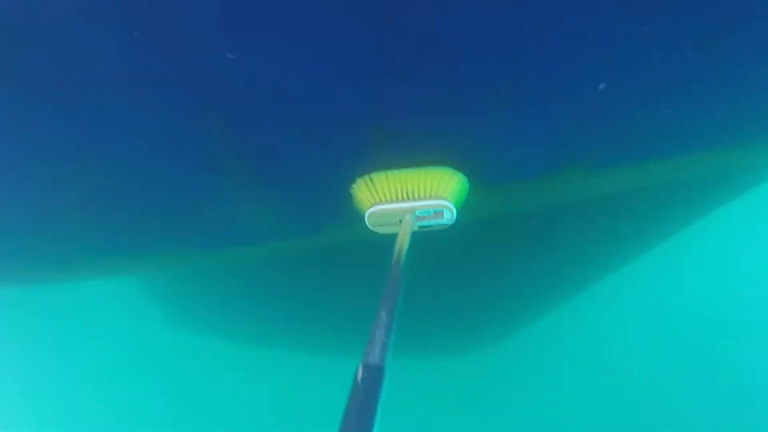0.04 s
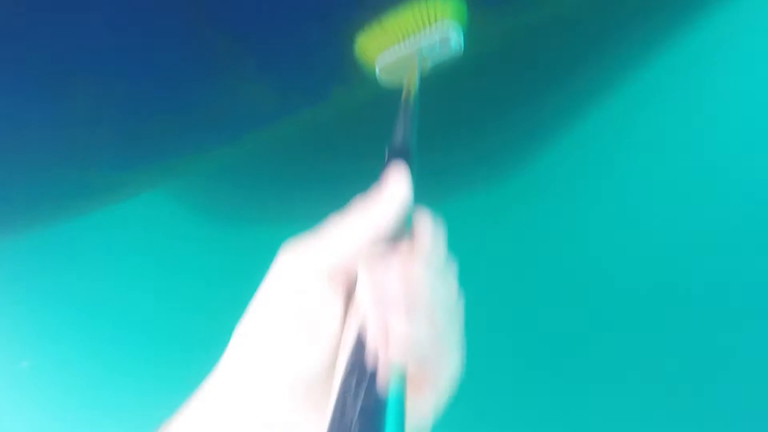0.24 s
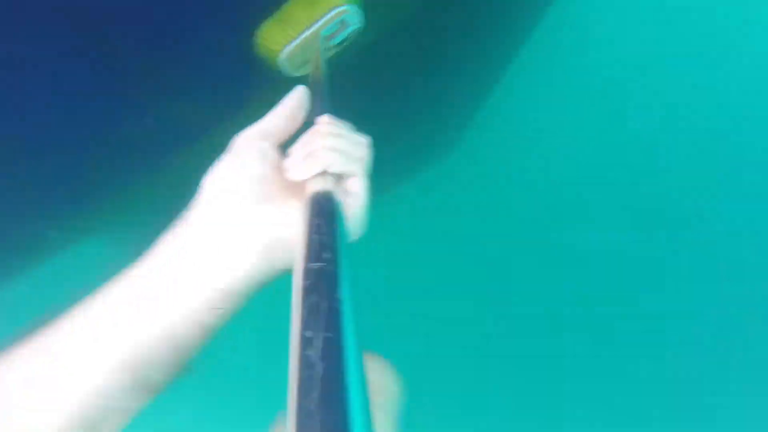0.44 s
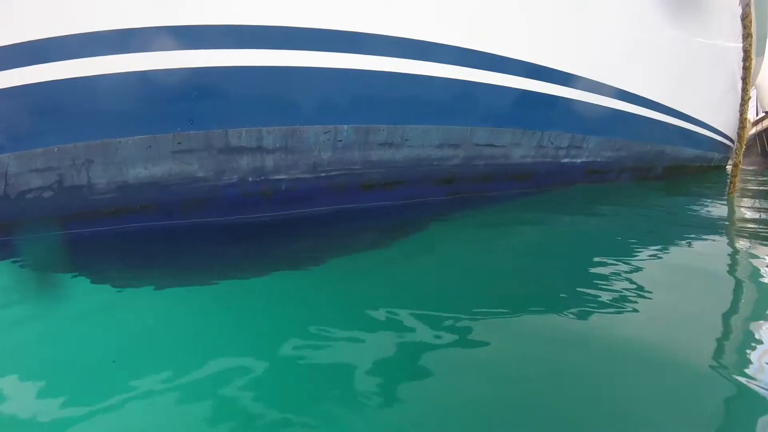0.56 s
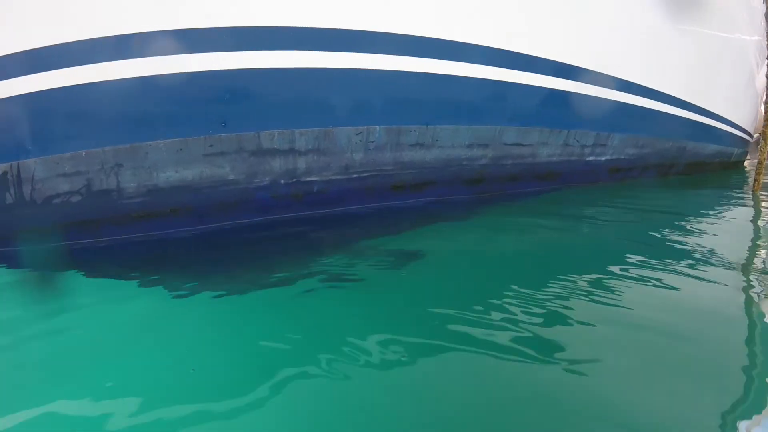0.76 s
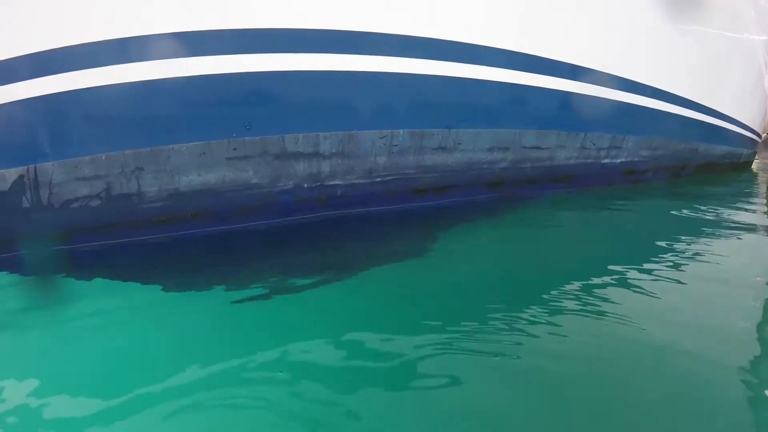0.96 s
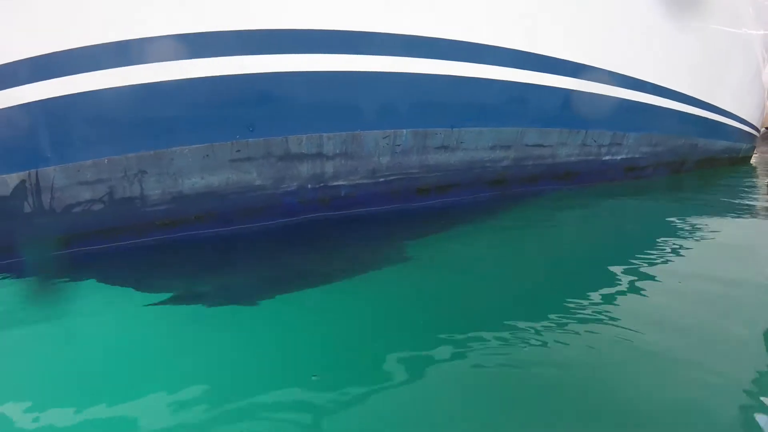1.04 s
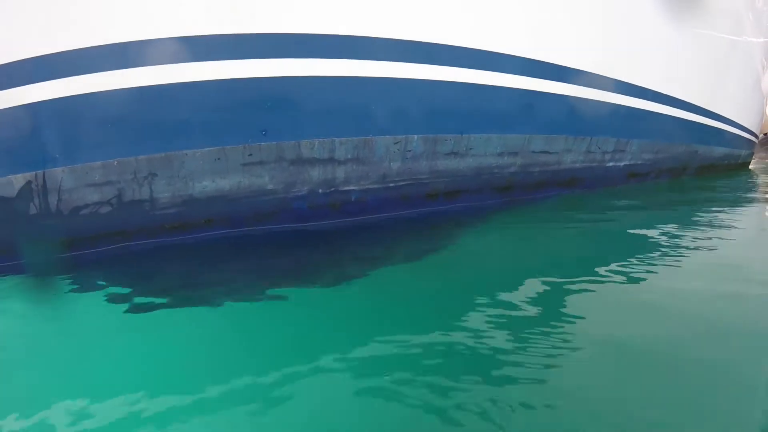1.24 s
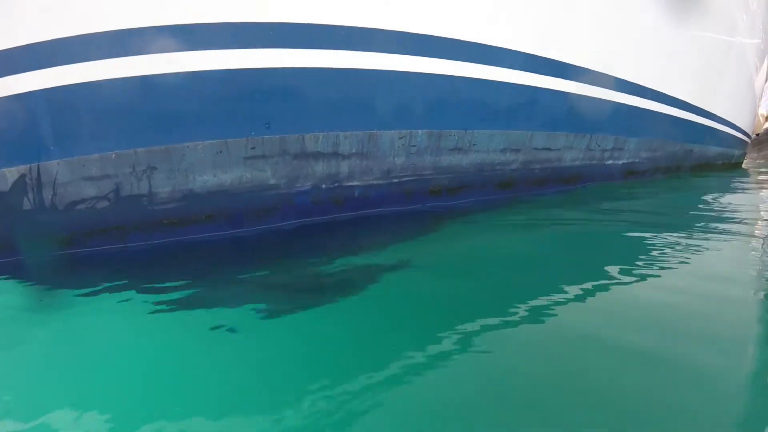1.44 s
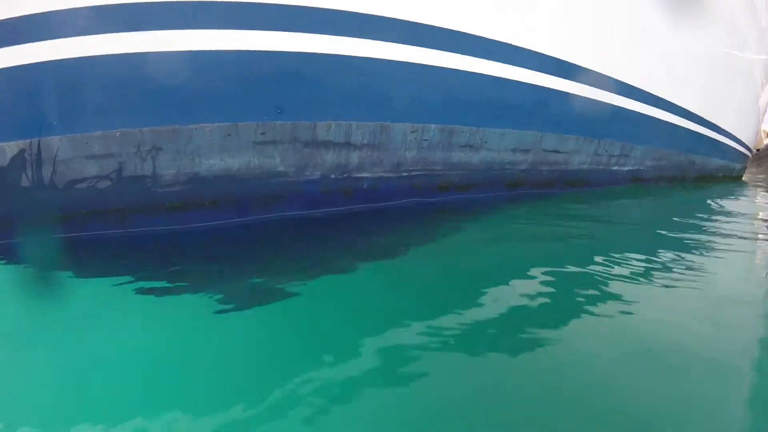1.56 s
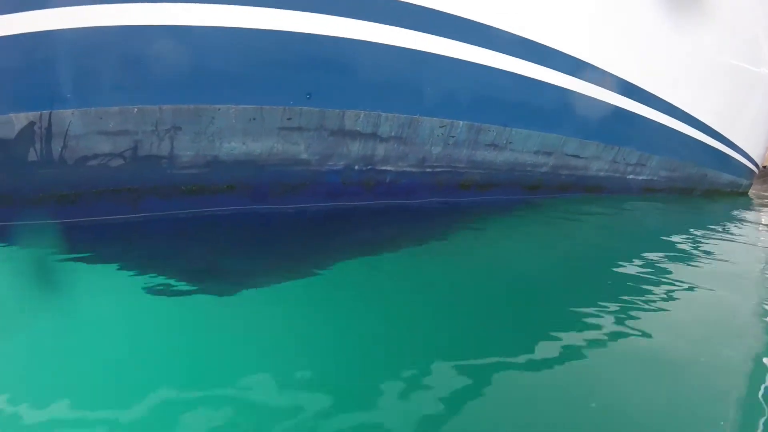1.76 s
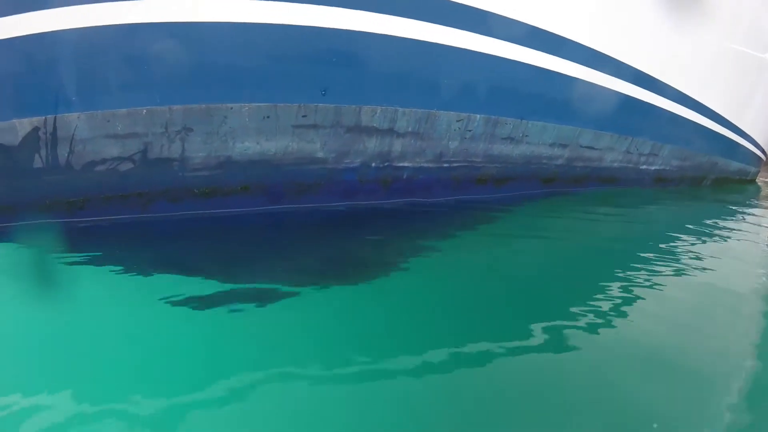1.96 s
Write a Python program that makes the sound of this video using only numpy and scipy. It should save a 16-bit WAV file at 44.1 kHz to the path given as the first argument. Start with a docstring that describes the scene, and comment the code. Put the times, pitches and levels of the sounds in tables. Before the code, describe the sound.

A brush bumps and scrubs a hull underwater, cutting abruptly to quiet open air.

```python
"""Brush on a boat hull, under water.

Heard from a sealed camera housing: the long brush pole ticks and bumps, the housing takes one hollow
knock, stick-slip rubbing groans through it and water sways against it. At 0.56 s the scene switches
abruptly to quiet air above the surface: a light breeze and one drip. Faint hiss runs throughout."""
import sys
import numpy as np
from scipy import signal
from scipy.fft import rfft, irfft
from scipy.io import wavfile
from scipy.ndimage import uniform_filter1d

SR = 44100
rng = np.random.default_rng(int(sys.argv[2]) if len(sys.argv) > 2 else 0)


def dump_mix(stems):
    """Bounce the given channels to the path in sys.argv[1] as a 16-bit WAV at rate SR."""
    frames = np.atleast_2d(stems).T  # one column per channel
    limited = np.clip(frames, -1, 1)  # hard clip at full scale
    pcm = np.round(limited * 32767).astype(np.int16)
    wavfile.write(sys.argv[1], SR, pcm)


N = 88200
T = np.arange(N) / SR


# pole modes: f/Hz, level/dB
POLE_MODES = [(715, 7.5), (1020, -2), (1250, -7.5), (1520, -20), (1830, -10.5), (1990, -12), (2390, -6),
              (2610, -12.5), (3300, -7), (3680, -11), (4040, -11.5), (4520, -9), (4900, -11.5), (5800, -11),
              (6050, -21)]
# pole contacts: t/s, level/dB, ring t60/s, ring low/Hz, ring high/Hz, crack level/dB, crack top/Hz
POLE_TICKS = [(.0995, -34.5, .012, 504, 1700, -1, 2400), (0.132, -37.5, .012, 1500, 3900, -23, 3500),
              (0.1914, -46, .012, 900, 3450, -28, 3000), (0.209, -55, .02, 3000, 4270, -32, 4000),
              (.2500, -27.5, .014, 543, 4170, -10, 4200), (0.2547, -31.5, .016, 1420, 3700, -1, 3500),
              (0.2763, -39.5, 0.042, 2060, 6200, -11, 4000), (0.3705, -33, 0.022, 3900, 5600, -12, 12100),
              (0.3796, -40, .03, 3700, 5400, -8.5, 12000), (0.4239, -55.5, .03, 1510, 4500, -17, 3960),
              (0.4294, -39.5, .018, 900, 2500, -8, 2500), (.4380, -49, .025, 1225, 3800, -5.5, 3540),
              (0.5588, -38, .008, 2300, 3300, -27.5, 3000)]
GRIP_DETUNE, RATTLE_DB, CRACK_T60_S = .008, -8.5, .007

def ticks():
    """Hard contacts crack and ring the pole; grip and place set their ring and range."""
    out = np.zeros(N + SR)
    t = T[:SR // 8]
    hz, mode_db = np.transpose(POLE_MODES)
    for s, db, t60_s, low_hz, high_hz, crack_db, top_hz in POLE_TICKS:
        strengths = from_db(mode_db + rng.standard_normal(len(hz))) * rng.choice([-1, 1], len(hz))
        detuned_hz = hz * (1 + GRIP_DETUNE * rng.standard_normal(len(hz)))
        modes = strengths @ np.sin(2 * np.pi * np.outer(detuned_hz, t))
        rattle = from_db(RATTLE_DB) * rng.standard_normal(len(t))   # dense, unpitched part of the ring
        ring = (modes + rattle) * from_db(-60 * t / t60_s)
        ring = cut(cut(ring, low_hz, "high", order=3), high_hz, "low", order=5)
        crack = from_db(crack_db - 60 * t / CRACK_T60_S) * rng.standard_normal(len(t))
        crack = cut(crack, top_hz, "low", order=3)
        start = int(s * SR)
        out[start:start + len(t)] += from_db(db) * (ring + crack)
    return out[:N]


# hollow modes of the housing: f/Hz, level/dB, time to peak/s
HOLLOW_MODES = [(591, -0.5, 0.0046), (981, -20, 0.0041), (1466, -41, 0.0053), (1818, -40.5, 0.0078),
                (2364, -27, 0.0033), (4530, -41.5, 0.0025)]
KNOCK_S, KNOCK_DB = .3752, -9.5

def knock():
    """A soft, heavy contact: the modes swell for a few cycles and die."""
    t = since(KNOCK_S)
    out = np.zeros(N)
    for hz, db, peak_s in HOLLOW_MODES:
        swell = (t / peak_s * np.exp(1 - t / peak_s)) ** 2
        out += from_db(KNOCK_DB + db) * swell * np.sin(2 * np.pi * hz * t)
    return out


# dull bumps: t/s, level/dB, rise/s, decay/s
POLE_BUMPS = [(.0990, -13, .0008, 0.009), (0.133, -19, .0012, 0.0092), (0.243, -23, 0.00023, .001),
              (0.2511, -29, 0.0003, .0015), (0.2558, -17, 0.00097, .005), (.3265, -27, .001, 0.0055),
              (0.3664, -18, .001, .002), (0.3845, -19, .001, .002), (0.554, -25, 0.0011, .002)]

def bumps():
    """Each bump is one push of pressure that leaks away."""
    push = np.zeros(N)
    for s, db, rise_s, decay_s in POLE_BUMPS:
        t = since(s)
        push += from_db(db) * (1 - np.exp(-(t / rise_s) ** 2)) * np.exp(-t / decay_s)
    return cut(push, 15, "high", order=1)


# rubbing pressure: t/s, level/dB
RUB_PRESSURE = [(0, -59.5), (.055, -57), (.09, -44), (.125, -42), (.18, -38), (.228, -58), (.265, -49.5),
                (.305, -59), (.338, -54), (.348, -40.5), (.365, -42), (.39, -27), (.42, -27.5),
                (.448, -34.5), (.462, -27), (.50, -27), (.53, -24.5), (.56, -27.5)]
# rubbed housing modes: f/Hz, width/Hz, level/dB
HOUSING_MODES = [(118.5, 27, -5), (201, 40, -2), (314, 44, -8.5), (360, 43, -4), (449, 53, -2.5),
                 (565, 55, 0), (637, 76, -2.5), (741, 60, -5.5), (980, 180, -10.5)]
# bristle hiss spectrum: f/Hz, level/dB
BRISTLE_SPECTRUM = [(900, -2.5), (1400, -1), (1800, 10.5), (2050, -4.5), (2400, 7.5), (2900, -3.5),
                    (4500, -1.5), (7000, -14), (10000, -29)]
SLIPS_PER_S, SLIP_SPREAD_DB, MUFFLE_HZ = 1500, 3, 767
BRISTLE_DB, BRISTLE_DB_PER_RUB_DB = -64, .12

def rubbing():
    """Dense little slips ring the housing; the water muffles all but a faint bristle hiss."""
    slips = (rng.random(N) < SLIPS_PER_S / SR) * rng.choice([-1, 1], N)
    slips = slips * from_db(SLIP_SPREAD_DB * rng.standard_normal(N))
    body = sum((-1) ** k * from_db(db) * resonate(slips, hz, width_hz)
               for k, (hz, width_hz, db) in enumerate(HOUSING_MODES))
    body = steady(cut(body, MUFFLE_HZ, "low", order=7), samples=600)
    pressure = level(RUB_PRESSURE)
    hiss = pressure ** BRISTLE_DB_PER_RUB_DB * from_db(BRISTLE_DB) * noise(BRISTLE_SPECTRUM)
    return pressure * body + hiss


# pitched rubs: t/s, length/s, f/Hz, glide/Hz, level/dB
RUB_GROANS = [(.168, 0.0464, 256, -28, -39), (.395, .055, 142, -8.5, -29), (.470, 0.047, 186, 29.5, -27.5),
              (.480, .046, 555, 59.5, -22.5), (.453, 0.052, 770, 10.5, -30.5),
              (.337, 0.039, 385, 20.5, -39)]
WOBBLE_DEPTH, WOBBLE_BANDWIDTH_HZ = .035, 81.4

def groans():
    """Stick and slip briefly fall into step and give a wavering tone."""
    out = np.zeros(N)
    for s, length_s, hz, glide_hz, db in RUB_GROANS:
        progress = np.clip((T - s) / length_s, 0, 1)
        wobble = rms_one(cut(rng.standard_normal(N), WOBBLE_BANDWIDTH_HZ, "low"))
        pitch_hz = (hz + glide_hz * (progress - .5)) * (1 + WOBBLE_DEPTH * wobble)
        tone = np.sqrt(2) * np.sin(2 * np.pi * np.cumsum(pitch_hz) / SR)
        out += from_db(db) * np.sin(np.pi * progress) * tone
    return cut(out, MUFFLE_HZ, "low", order=4)


# water sway envelope: t/s, level/dB
SWAY_ENVELOPE = [(0, -47.5), (.06, -30.5), (.11, -27.5), (.24, -20.5), (.30, -38), (.345, -33.5),
                 (.40, -18.5), (.45, -19.5), (.52, -25.5), (.56, -33.5)]
# water sway spectrum: f/Hz, level/dB
SWAY_SPECTRUM = [(11, 7.5), (20, -1.5), (35, -18), (55, -15.5), (90, -32.5), (150, -45.5), (300, -45)]

def sway():
    """Slow pressure swings of water pushed past the housing."""
    return level(SWAY_ENVELOPE) * steady(noise(SWAY_SPECTRUM), samples=2400)


# buffeting spectrum: f/Hz, level/dB
BREEZE_SPECTRUM = [(5, -2.5), (11, -3.5), (20, -10), (32, -22), (55, -25.5), (100, -35), (300, -78)]

def breeze(db=-46):
    """Light wind buffets the housing above the water."""
    return from_db(db) * steady(noise(BREEZE_SPECTRUM), samples=9000)


def drip(s=1.7674, hz=2400, db=-56, t60_s=.018):
    """A single drop rings briefly."""
    t = since(s)
    return from_db(db - 60 * np.minimum(t / t60_s, 10)) * np.sin(2 * np.pi * hz * t)


# background hiss spectrum: f/Hz, level/dB
HISS_SPECTRUM = [(35, -26.5), (60, 1), (125, -2), (215, -7.5), (303, -10), (399, -13), (615, -15),
                 (827, -18), (2470, -25), (9080, -37.5), (9940, -39.5), (14000, -49.5)]

def background(hiss_db=-60, whine_db=-93, whine_hz=9598):
    """Even hiss with a thin electrical whine in it."""
    whine = from_db(whine_db) * np.sqrt(2) * np.sin(2 * np.pi * whine_hz * T)
    return from_db(hiss_db) * noise(HISS_SPECTRUM) + whine


def from_db(db):
    """Decibels to gain."""
    return 10 ** (np.asarray(db) / 20)


def rms_one(x):
    """Scale to unit rms."""
    return x / np.sqrt(np.mean(x ** 2) + 1e-20)


def level(rows):
    """Gain over time from rows of t/s, level/dB."""
    return from_db(np.interp(T, *np.transpose(rows)))


def since(s):
    """Seconds since an onset, zero before it."""
    return np.maximum(T - s, 0)


def cut(x, hz, kind, order=2):
    """Butterworth low- or high-pass."""
    return signal.sosfilt(signal.butter(order, min(hz, .45 * SR), kind, fs=SR, output="sos"), x + 1e-18)


def noise(spectrum):
    """Unit-rms noise from rows of f/Hz, level/dB; falls away beyond both ends."""
    hz, db = np.transpose(spectrum)
    f = np.maximum(np.arange(N // 2 + 1) * SR / N, 1e-3)
    gain = from_db(np.interp(np.log(f), np.log(hz), db))
    skirts = (np.minimum(f / hz[0], 1) * np.minimum(hz[-1] / f, 1)) ** 2
    return rms_one(irfft(rfft(rng.standard_normal(N)) * gain * skirts, N))


def resonate(x, hz, width_hz):
    """Two-pole resonance, unit peak gain."""
    r = np.exp(-np.pi * width_hz / SR)
    feedback = [1, -2 * r * np.cos(2 * np.pi * hz / SR), r * r]
    return signal.lfilter(np.array([1, 0, -1]) * (1 - r * r) / 2, feedback, x)


def steady(x, samples):
    """Even out loudness over a smooth window."""
    power = uniform_filter1d(uniform_filter1d(x ** 2, size=samples), size=samples)
    return x / np.sqrt(np.abs(power) + 1e-12)


SURFACE_S, FADE_S = .557, .010

def scene():
    """Handling under water, then a light breeze above it."""
    submerged = np.clip((SURFACE_S + FADE_S - T) / FADE_S, 0, 1)
    below = rubbing() + groans() + bumps() + knock() + sway()
    above = breeze() + drip()
    return (submerged ** 2 * below + (1 - submerged) * above + ticks() + background())[None]


CUTOFF_HZ = 14100

def record(dry):
    """Steep elliptic low-pass."""
    return signal.sosfilt(signal.ellip(10, .1, 80, CUTOFF_HZ, fs=SR, output="sos"), dry)


dry = scene()
out = record(dry)
dump_mix(out)
```